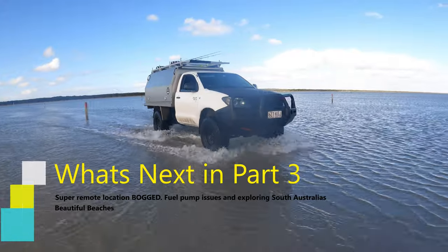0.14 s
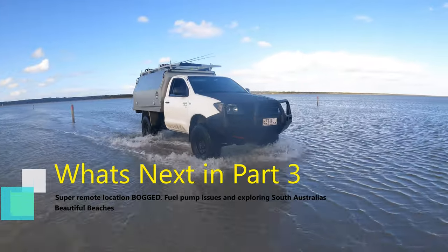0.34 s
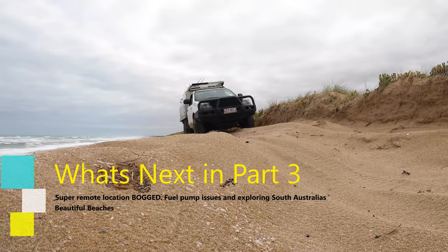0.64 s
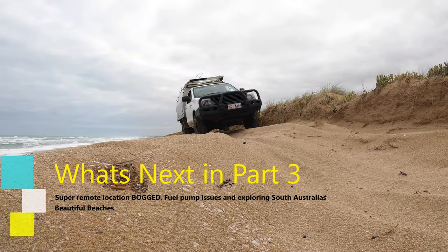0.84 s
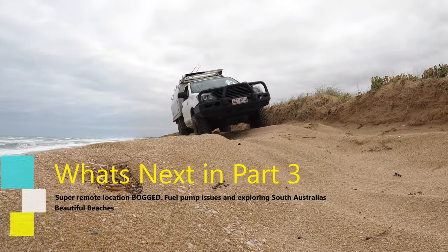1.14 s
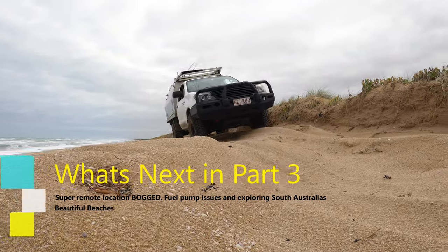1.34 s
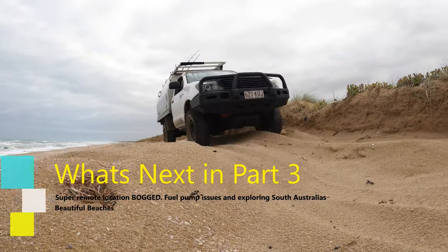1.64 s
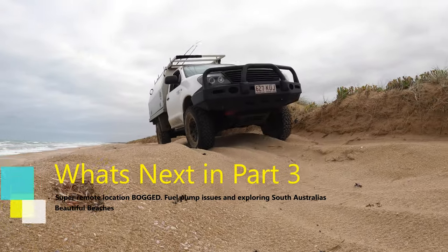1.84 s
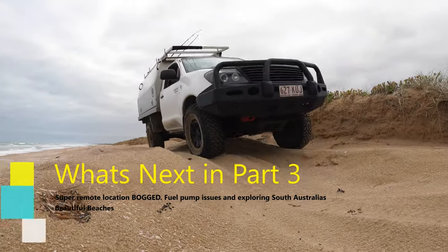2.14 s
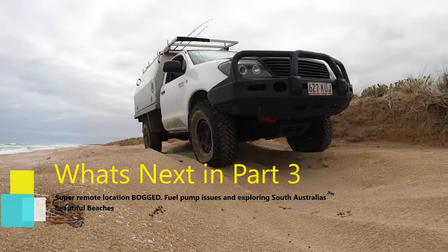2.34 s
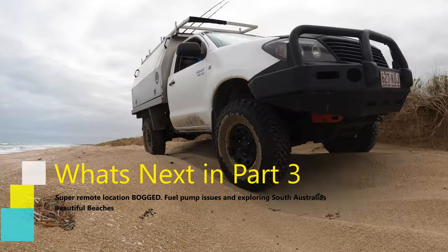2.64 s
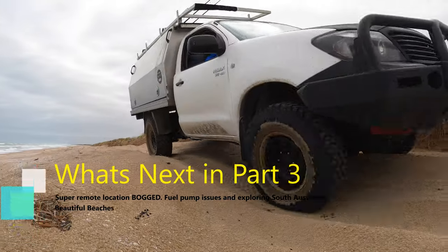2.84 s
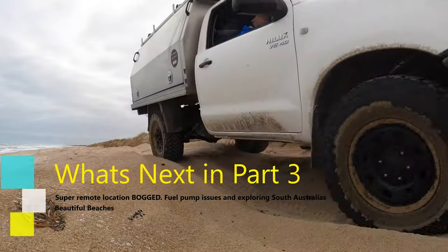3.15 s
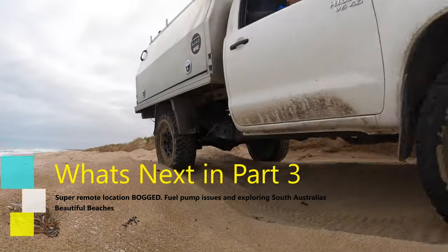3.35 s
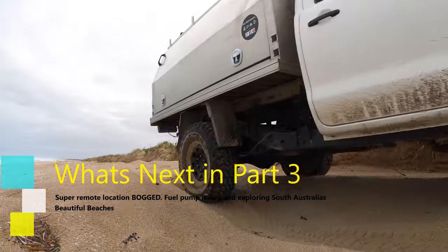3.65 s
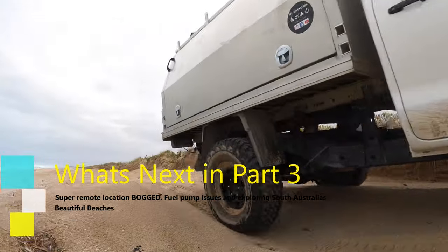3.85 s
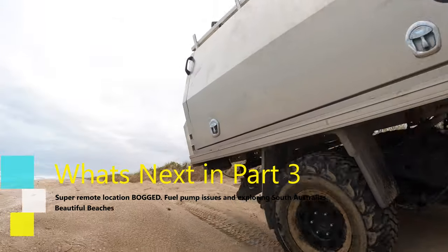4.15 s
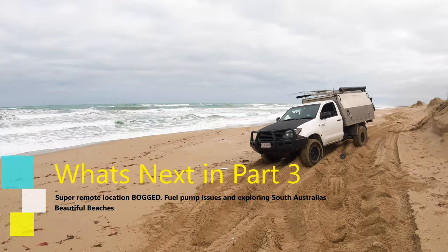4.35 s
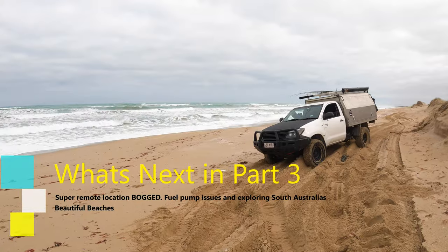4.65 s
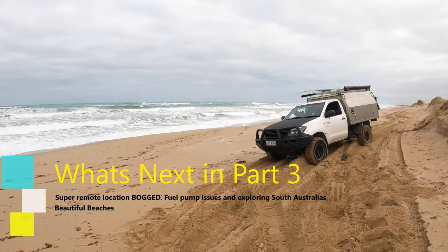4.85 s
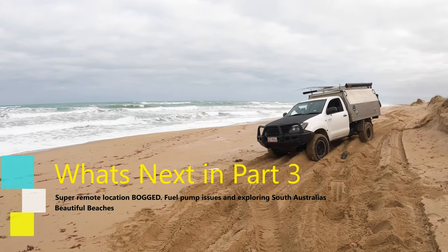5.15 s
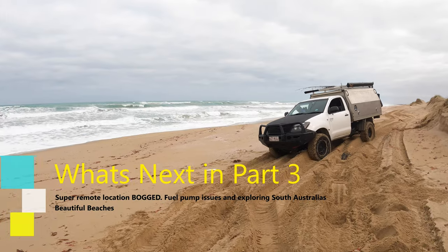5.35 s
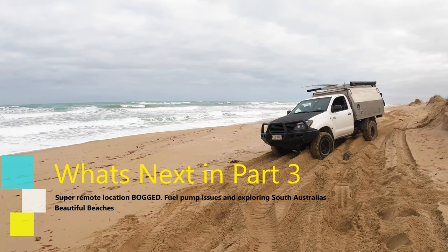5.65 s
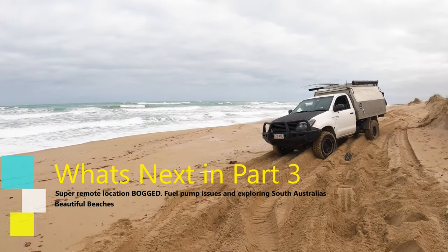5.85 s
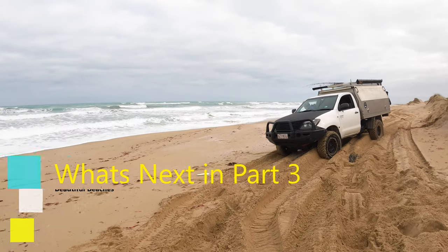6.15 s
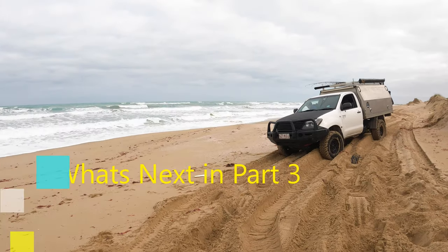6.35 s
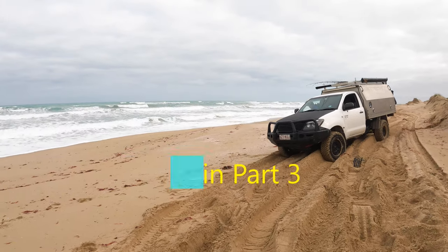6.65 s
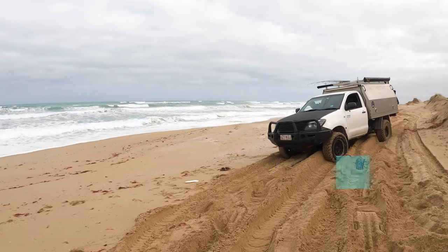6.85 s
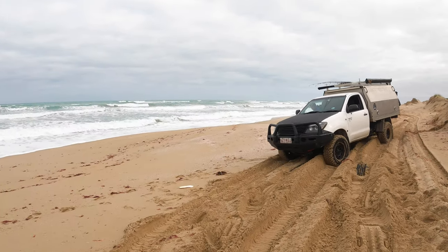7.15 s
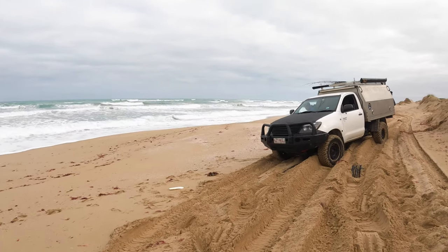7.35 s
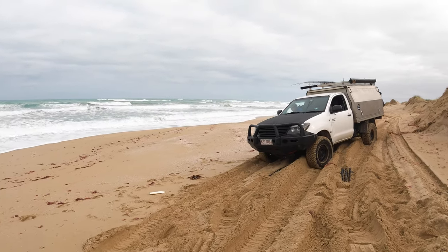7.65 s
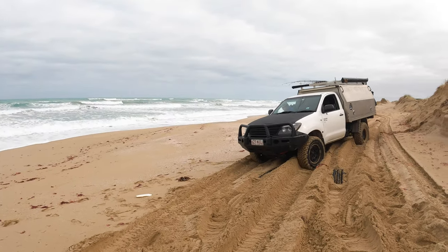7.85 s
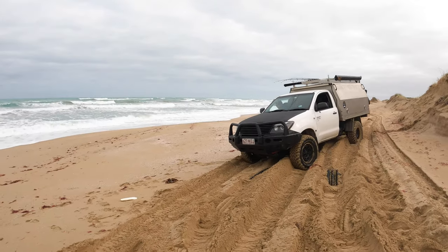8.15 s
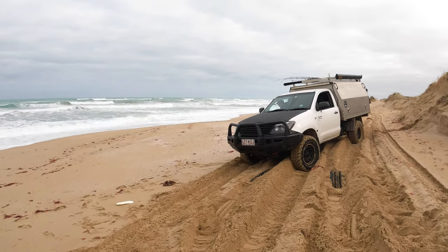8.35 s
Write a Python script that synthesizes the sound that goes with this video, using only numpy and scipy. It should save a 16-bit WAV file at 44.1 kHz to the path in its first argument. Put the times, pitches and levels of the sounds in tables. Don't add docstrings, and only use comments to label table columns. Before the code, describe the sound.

From 0 to 0.45 seconds, wheels shove through shallow water: a low, full surge, a bright sheet of splash and quick overlapping slaps, with one close drop near the end. A small jump cuts to a windy beach and a close four-cylinder diesel. Its chug and clattering knock swell around 1.6, then sink to a slow, low beat near 2.2, with soft thuds at 2.2-2.3. Sand sprays around 2.4, and a throaty burst peaks at 2.65 with a faint high squeak. It eases by 3.3, then barks again from 3.5, revs rising until 3.9, gritty sand hissing and a slight whine. At 4.27 another jump moves to surf: a wave breaks and foams while the truck drones further off. The drone gradually drops between 6 and 6.7, holds lower, then falls away from 8.2 with final low wind thumps. Wind buffets the microphone throughout the beach sections.

```python
import sys
import numpy as np
from scipy import signal
from scipy.fft import rfft, irfft, next_fast_len
from scipy.io import wavfile
from scipy.ndimage import uniform_filter1d, minimum_filter1d, map_coordinates

SR = 44100
rng = np.random.default_rng(int(sys.argv[2]) if len(sys.argv) > 2 else 0)


def inscribe(sig):
    pcm = np.round(np.clip(np.atleast_2d(sig).T, -1, 1) * 32767)
    wavfile.write(sys.argv[1], SR, pcm.astype(np.int16))


def voltage_ratio(level):
    return 10 ** (np.asarray(level, float) / 20)


N = 374409

# time [s], level [dB].
NEAR_THROTTLE = [(.45, -23), (.95, -23), (1.35, -18.5), (1.6, -15.5), (1.79, -19), (1.97, -33),
                 (2.25, -35.5), (2.44, -24.5), (2.55, -15.5), (2.65, -12.5), (2.8, -16), (3.05, -20.5),
                 (3.28, -35), (3.45, -20), (3.55, -14), (3.75, -13), (3.92, -12), (4.27, -14.5)]
# time [s], level [dB].
FAR_THROTTLE = [(4.27, -17), (5.2, -19), (6.1, -17.5), (6.5, -16), (6.75, -18), (7.1, -16), (8.1, -16),
                (8.19, -20), (8.28, -31.5), (8.49, -35.5)]


def unit(x):
    return x / np.sqrt(np.mean(x ** 2) + 1e-20)


def curves(rows):
    s, *cols = np.transpose(rows)
    return [np.interp(np.arange(N) / SR, s, c) for c in cols]


def bumps(rows):
    t = np.arange(N) / SR
    return sum(height * np.exp(-((t - s) / width) ** 2) for s, width, height in rows)


def wobble(rate):
    knots = rng.standard_normal(int(N * rate / SR) + 4)
    return map_coordinates(knots, [np.arange(N) * rate / SR])


def filtered(x, response):
    m = next_fast_len(N + 8192)
    return irfft(rfft(x, m) * response(np.fft.rfftfreq(m, 1 / SR)), m)[:N]


def coloured(x, spectrum):
    f, db = np.transpose(list(spectrum) + [(SR / 2 + 1, -120)])
    return unit(filtered(x, lambda hz: voltage_ratio(np.interp(np.log(hz + 1), np.log(f + 1), db))))


def rush(spectrum, patchy_db):
    z = signal.stft(rng.standard_normal(N), nperseg=512)[2]
    field = uniform_filter1d(rng.standard_normal(z.shape), size=8, axis=0)
    field = uniform_filter1d(field, size=8, axis=1)
    patched = signal.istft(z * voltage_ratio(patchy_db * unit(field)), nperseg=512)[1][:N]
    return coloured(patched, spectrum)


def grains(count, size_db):
    when, size, sign = rng.random((count, 3)).T
    hits = np.sign(sign - .5) * voltage_ratio(-size_db * np.log(size + 1e-4))
    return np.bincount((when * N).astype(int), hits, N)


def beach(shot):
    # frequency [Hz], level [dB per Hz].
    buffet_spectra = [
        [(4, -13.5), (25, -8.5), (45, -3), (100, -3), (170, -2.5), (260, -10.5), (400, -23.5), (800, -61.5)],
        [(4, -6), (25, -2.5), (45, 4), (100, -0.5), (170, 2.5), (260, -7), (400, -27), (800, -65)],
    ]
    # frequency [Hz], level [dB per Hz].
    roar_spectrum = [(180, -30.5), (300, 0.5), (556, -5), (1080, -17), (1190, -20.5), (2340, -38),
                     (3000, -34), (3900, -59.5), (6600, -120)]
    # frequency [Hz], level [dB per Hz].
    hiss_spectra = [
        [(590, -32), (1000, -3), (1250, -2), (1770, -5), (2790, -10), (3410, -9), (4630, -13.5), (7140, -19.5),
         (12500, -34.5), (16200, -65.5), (22000, -120)],
        [(590, -29), (1000, -6), (1180, -8.5), (1360, -7), (1920, -9), (2360, -9), (4160, -15), (7750, -26.5),
         (13500, -52.5)],
    ]
    # frequency [Hz], level [dB per Hz].
    spray_spectrum = [(8000, -62.5), (10500, -8.5), (12500, -3.5), (15000, -1.5), (16500, -61)]
    # time [s], strength [dB].
    churn_rows = [
        [(.45, 0), (1.0, 0), (1.15, 3.5), (1.35, 0), (2.25, 0.5), (2.45, 4.5), (2.66, 8.5), (2.86, -0.7),
         (3.39, 0.5), (3.53, 7.5), (3.8, 4.5), (3.95, -2.5), (4.27, -5)],
        [(4.27, -0.5), (4.52, 1.3), (5.1, 0.9), (6.2, 2), (6.75, -2), (7.2, -1), (7.6, -2.5), (8.49, -4.5)],
    ]
    # centre [s], width [s], swell [dB].
    gust_rows = [(.7, 0.44, 3), (2.15, 0.11, 2), (3.62, 0.19, 4.5), (3.95, 0.19, 3.5), (4.42, 0.32, 2.5),
                 (6.27, 0.092, 2), (6.77, 0.19, 1), (7.8, 0.7, 1.5), (8.3, 0.12, 2)]
    # centre [s], width [s], level [dB].
    spin_rows = [(1.0, .06, -83), (1.2, .1, -83), (1.6, .06, -85), (2.38, .13, -71), (2.65, .1, -84),
                 (3.2, .12, -84), (3.65, 0.061, -81), (5.6, .1, -104)]
    # level [dB], shares of churn, gusts, throttle [ratio].
    buffet_rule, roar_rule = [(-26, .1, 0.87, 0.22), (-23, .6, .1, .05)], [(-39.5, 0.46, 0.91, 0.071), (-34.5, .05, 0.99, 0.034)]
    hiss_db, spray_db = [-47.5, -43], [-92, -118]

    throttle = [NEAR_THROTTLE, FAR_THROTTLE][shot]
    effort_db = np.minimum(curves(throttle)[0] + 20, 2.5)
    churn_db, gusts_db = curves(churn_rows[shot])[0], bumps(gust_rows)

    def driven_db(db, churn, gusts, effort):
        return db + churn * churn_db + gusts * gusts_db + effort * effort_db

    gust = wobble(7)
    buffet = voltage_ratio(driven_db(*buffet_rule[shot]) + wobble(9)) * rush(buffet_spectra[shot], patchy_db=1.0)
    roar = voltage_ratio(driven_db(*roar_rule[shot]) + gust / 3) * rush(roar_spectrum, patchy_db=.5)
    hiss_level_db = hiss_db[shot] + churn_db + [.65, .3][shot] * gust + 0.29 * wobble(25)
    hiss = voltage_ratio(hiss_level_db) * rush(hiss_spectra[shot], patchy_db=0.86)
    thrown = voltage_ratio(spray_db[shot]) + bumps([(s, width, voltage_ratio(db)) for s, width, db in spin_rows])
    sand = coloured(grains(count=30000, size_db=3.0), spray_spectrum)
    spray = thrown * voltage_ratio(3.5 * wobble(22)) * sand
    return buffet + roar + hiss + spray


def breaker():
    # centre [s], width [s], level [dB].
    waves = [
        (4.42, .33, -44),
    ]
    # frequency [Hz], level [dB].
    foam = [(400, -30), (650, -4), (1000, 2), (1500, -8), (2500, -31)]
    return bumps([(s, width, voltage_ratio(db)) for s, width, db in waves]) * rush(foam, patchy_db=2.5)


def wading():
    # time [s], surge [dB].
    wade = [(0.0, -18), (0.034, -18), (0.042, -15), (0.25, -14), (0.28, -16.5), (0.36, -15), (0.452, -16.5)]
    # frequency [Hz], level [dB per Hz].
    surge_spectrum, splash_spectrum = [(12, -37), (20, -9.5), (75, 0.5), (112, -2), (216, -3), (416, -12),
                                       (505, -16.5), (700, -25.5), (910, -38), (1540, -120)], [(260, -31), (450, -11), (863, -6), (1180, -16),
                                                      (1330, -13.5), (1490, -15.5), (5580, -26.5),
                                                      (9090, -41.5), (13000, -56), (15500, -90.5)]
    # time [s], peak [dB], fall by 60 dB [s].
    slap_rows = [(0.038, -10.5, 0.076), (0.076, -18, 0.078), (0.123, -18, 0.051), (0.154, -14.5, 0.046),
                 (0.21, -14, 0.11), (0.231, -14, .03), (0.247, -12, 0.08), (0.312, -19.5, 0.049),
                 (0.333, -28, .04), (0.372, -16, 0.058)]
    # time [s], peak [dB].
    drops = [
        (0.4, -27),
    ]

    surge_db, = curves(wade)
    t = np.arange(N) / SR
    churn = rush(surge_spectrum, patchy_db=-2.0)
    power = np.abs(uniform_filter1d(churn ** 2, size=2000))
    surge = voltage_ratio(surge_db) * churn / np.sqrt(power + 0.083)
    bow_fall_db = bumps([(.45, 0.047, -0.5)])
    sheet = voltage_ratio(-32 + bow_fall_db + 1.6 * wobble(32.3)) * rush(splash_spectrum, patchy_db=1.5)
    lumps = sum(voltage_ratio(db - 8 - 60 * np.abs(t - s) / np.where(t > s, t60, .004)) for s, db, t60 in slap_rows)
    slaps = lumps * rush(splash_spectrum[:6] + [(3500, -31), (8000, -57)], patchy_db=5.5)
    tick = sum(voltage_ratio(db - 3 - 60 * np.abs(t - s - .001) / 0.0048) for s, db in drops)
    drop_noise = rush([(1500, -50), (3500, -2.5), (8000, -7), (11000, -29)], patchy_db=2)
    return surge + sheet + slaps + tick * drop_noise


def thuds():
    # time [s], peak [dB], frequency [Hz].
    pushes = [(2.21, -19.5, 110), (2.31, -13, 131), (2.335, -12, 130), (8.399, -12, 71),
              (8.464, -11.5, 152)]
    t = np.arange(N) / SR
    return sum(-voltage_ratio(db) * np.exp(-(1.37 * hz * (t - s)) ** 2) * np.cos(2 * np.pi * hz * (t - s))
               for s, db, hz in pushes)


def squeaks():
    # start [s], length [s], frequency [Hz], level [dB].
    whistles = [
        (1.987, 0.14, 9300, -65),
        (2.717, 0.13, 9450, -58),
        (2.84, 0.1, 9400, -67),
        (2.884, 0.12, 758, -48),
        (3.726, 0.24, 948, -43.5),
    ]
    out, waver, flutter_db = np.zeros(N), 0.0085 * wobble(150), 4.9 * wobble(93)
    for s, length, hz, db in whistles:
        t = np.arange(int(length * SR)) / SR
        span = slice(round(s * SR), round(s * SR) + len(t))
        cycles = np.cumsum(hz * (1 + waver[span])) / SR
        swell = np.sqrt(np.abs(np.sin(np.pi * t / length)))
        out[span] += voltage_ratio(db + flutter_db[span]) * swell * np.sin(2 * np.pi * cycles)
    return out


def exhaust(speed, effort, pipe, orders, sings, tail, lead_turns, uneven_db, jitter):
    rate, t = curves(speed)[0], np.arange(N) / SR
    hz, pipe_db = np.transpose(pipe)

    def singing_db(k):
        return bumps([row[1:] for row in sings if row[0] == k])

    shares = []
    for k, db, rear_db, s in orders:
        passed_db = np.interp(np.log(k * rate), np.log(hz), pipe_db)
        come_round = (1 + np.tanh((t - s) / .1)) / 2
        shares.append(db + passed_db + rear_db * come_round + singing_db(k))
    total_db = 10 * np.log10(np.sum(voltage_ratio(np.array(shares)) ** 2, axis=0))
    levels = curves(effort)[0] + shares - total_db
    cycles = np.cumsum(rate) / SR + jitter * wobble(14)
    parts = [(row[0], db) for row, db in zip(orders, levels)]
    parts += [(k, levels[lead] + db + singing_db(k)) for k, lead, db in tail]
    tones = 0
    for k, db in parts:
        turns = k * cycles + lead_turns - k * k / 11
        tones = tones + voltage_ratio(db + uneven_db * wobble(12)) * np.cos(2 * np.pi * turns)
    strokes = voltage_ratio(uneven_db * wobble(45))
    return np.sqrt(2) * strokes * tones, cycles, levels[-1]


def far_exhaust():
    # time [s], firing rate [firings per s].
    speed = [(4.27, 93.9), (4.6, 93.6), (5.32, 90.5), (5.7, 89.6), (6.07, 87), (6.22, 83.3), (6.52, 74.4),
             (6.7, 71.7), (7.15, 72.6), (7.57, 71.9), (8.02, 72.9), (8.32, 62.6), (8.49, 60.5)]
    # frequency [Hz], gain [dB].
    pipe = [(72, -13.5), (80, -17.5), (94, -1), (108, -6.5), (146, -2), (187, -2), (217, -19.5),
            (280, -25.5)]
    # multiple of firing rate, level [dB], gain once the tailpipe has come round [dB], when [s].
    orders = [(1, 0.4, 13, 8.25), (1.5, -14.5, 19, 8.25), (2, 0.4, 0.11, 8.25), (3, -1.4, 6.5, 8.25)]
    # multiple, centre [s], width [s], swell [dB].
    sings = [
        (1.5, 5.2, 1, 3.4),
    ]
    tail = [(2.5, 1, -16)]  # multiple, index of its leader, dB
    return exhaust(speed, FAR_THROTTLE, pipe, orders, sings, tail,
                   lead_turns=1 / 3, uneven_db=.5, jitter=1 / 80)[0]


def near_exhaust():
    # time [s], firing rate [firings per s].
    speed = [(0.45, 60.1), (0.95, 52), (1.05, 51.6), (1.55, 52.1), (1.72, 53), (1.85, 49.9), (2.05, 42.2),
             (2.2, 40), (2.46, 40.7), (2.76, 54.7), (2.85, 55.3), (3.05, 51.7), (3.3, 45.9), (3.45, 46.2),
             (3.8, 61.6), (3.9, 62.4), (4.12, 56), (4.27, 54.2)]
    # frequency [Hz], gain [dB].
    pipe = [(45, -7.5), (55, -12), (90, -2.5), (110, 0.5), (165, 0), (210, -3.5), (240, -8.5)]
    # multiple of firing rate, level [dB], gain once the tailpipe has come round [dB], when [s].
    orders = [(1, -0.5, 10, 3.46), (2, -0.2, 9, 3.79), (3, -0.05, 0, 2.6), (4, 0.1, -3, 4.0)]
    # multiple, centre [s], width [s], swell [dB].
    sings = [(3, 1.53, 0.45, 11), (4, 1.4, 0.38, 4), (4, 1.86, .1, 4), (4, 2.2, 0.1, 11),
             (3, 2.64, 0.17, 8.5), (3, 3.4, 0.14, -11), (4, 3.52, 0.093, 2), (3, 3.62, 0.081, 4.5),
             (5, 3.6, 0.15, 5.5), (6, 3.66, .1, 5.5), (5, 3.3, 0.28, -5.5), (3, 3.95, 0.14, -10),
             (3, 4.28, 0.16, 12)]
    tail = [(5, 3, -10), (6, 3, -19)]  # multiple, index of its leader, dB
    return exhaust(speed, NEAR_THROTTLE, pipe, orders, sings, tail,
                   lead_turns=0, uneven_db=0.3, jitter=1 / 120)


def rasp(cycles, fourth_db):
    # frequency [Hz], level [dB per Hz].
    rasp_spectrum = [(120, -34), (220, 7), (300, -6), (420, -15), (700, -36)]
    puffs = 0.42 + np.cos(np.pi * cycles) ** 2
    return voltage_ratio(1.08 * (fourth_db + 20.5) - 30.5) * coloured(puffs * rng.standard_normal(N), rasp_spectrum)


def load():
    # start [s], hold [s], level [dB], panel share [dB], pump share [dB].
    spell_rows = [(.46, .1, -60.5, 3, -8), (0.666, .03, -61, 7, -3), (0.803, .04, -58.5, 5, -10),
                  (.96, 0.27, -53.5, 2.5, -3.5), (1.36, 0.39, -50, -3.5, -7.5),
                  (1.853, 0.088, -55.5, 2.5, -17), (1.983, 0.012, -55.5, 8, -17),
                  (2.088, 0.037, -53.5, -1.3, -15), (2.376, 0.036, -70, 6, -1),
                  (2.495, 0.15, -43.5, 1.5, -15.5), (2.792, .05, -53, 0, -17), (2.92, .14, -57, -3, -13),
                  (3.101, .05, -54.5, 4, -16), (3.253, 0.04, -52.5, 2.5, -11), (3.41, 0.29, -50, 1.5, -7.5)]
    rise, fall, range_db = 0.29, 0.81, 15.5
    t = np.arange(N) / SR
    spells = []
    for s, hold, db, *_ in spell_rows:
        outside = np.maximum((s - t) / rise, (t - s - hold) / fall)
        spells.append(voltage_ratio(db - range_db * np.maximum(0, outside) / hold))
    block = sum(spells) + voltage_ratio(-66.5)
    panels = sum(g * voltage_ratio(row[3]) for g, row in zip(spells, spell_rows))
    pump = sum(g * voltage_ratio(row[4]) for g, row in zip(spells, spell_rows))
    flank_db = np.where(t < 2.5, -3, 3)
    return panels * voltage_ratio(flank_db - 3.5), panels * voltage_ratio(-1.0), block, pump


def knock(cycles):
    # centre [Hz], width [Hz], level [dB].
    part_modes = [
        [(1187, 270, -3)],
        [(1826, 240, -1)],
        [(2360, 220, -8), (3000, 750, 1)],
        [(4420, 500, -5.5), (4940, 350, 2.5), (8700, 2500, -14)],
    ]
    firing = np.maximum(cycles, 0).astype(int)
    count = firing.max() + 1
    cylinder_db = np.array([.8, -.6, .4, -0.88])[np.arange(count) % 4]
    size_db = rng.normal(0, 1.1, count) + cylinder_db
    blow = 9 * np.diff(firing, prepend=0)
    rattle = (0.36 + np.exp(-(cycles % 1) / 0.34)) * rng.standard_normal(N)
    burst = voltage_ratio(size_db[firing]) * (blow + rattle)
    out = 0
    for gain, modes in zip(load(), part_modes):
        def body(f):
            return sum((-1) ** k * voltage_ratio(db) * (1j * f * w / (c * c - f * f + 1j * f * w)) ** 2
                       for k, (c, w, db) in enumerate(modes))
        out = out + voltage_ratio(1.0) * gain * unit(filtered(burst, body))
    return out


def near_truck():
    tones, cycles, fourth_db = near_exhaust()
    return tones + rasp(cycles, fourth_db) + knock(cycles) + squeaks()


def scene():
    # time of the change [s], jump of the wave [full scale].
    cuts = [
        (.44927, -.055),
        (4.26927, .11),
    ]
    splice_s = .0015
    shallows, sand, shore = wading(), near_truck() + beach(0), far_exhaust() + beach(1) + breaker()
    since = [np.arange(N) / SR - s for s, _ in cuts]
    first, second = [np.clip(t / splice_s, 0, 1) for t in since]
    jumps = sum(jump * np.clip(t * SR / 2, 0, 1) * np.exp(-np.abs(t) / splice_s)
                for t, (_, jump) in zip(since, cuts))
    joined = shallows * (1 - first) + sand * (first - second) + shore * second
    return (joined + jumps + thuds())[None]


def roll_off(x):
    return signal.sosfilt(signal.butter(12, 15730, fs=SR, output="sos"), x)


def record(dry):
    reach = -minimum_filter1d(-np.abs(dry), size=700, axis=1)
    gain = uniform_filter1d(np.minimum(1, 0.54 / (reach + 1e-9)), size=500, axis=1)
    return roll_off(dry * gain)


dry = scene()
out = record(dry)
inscribe(out)
```